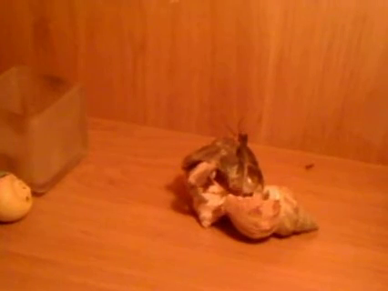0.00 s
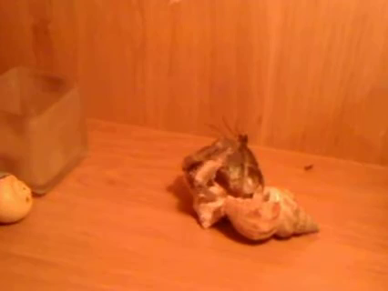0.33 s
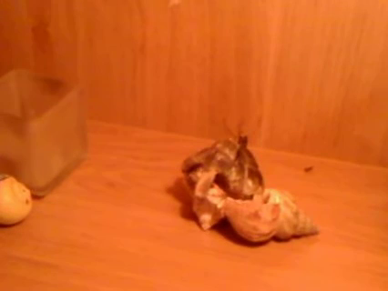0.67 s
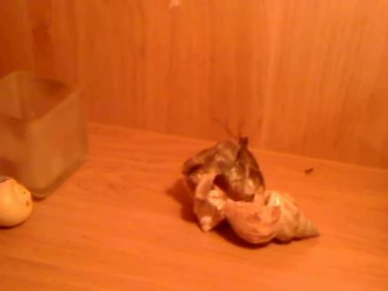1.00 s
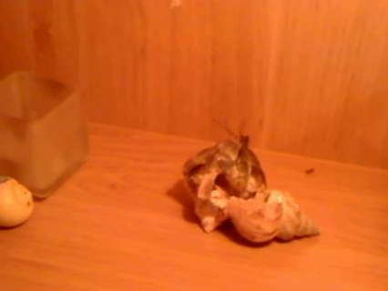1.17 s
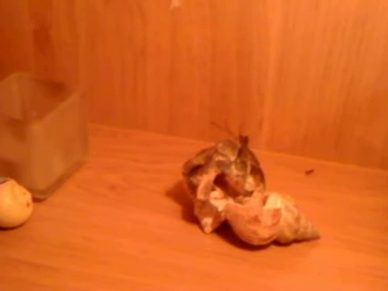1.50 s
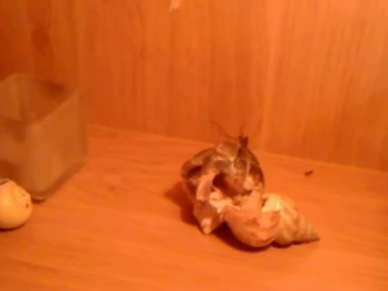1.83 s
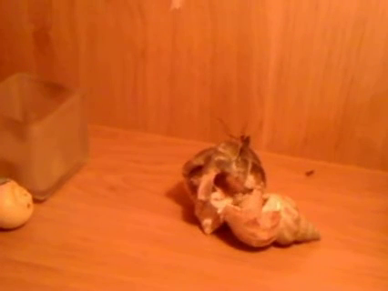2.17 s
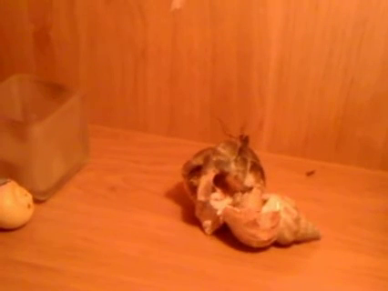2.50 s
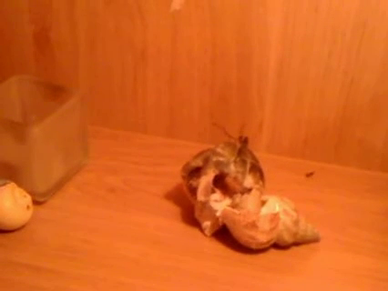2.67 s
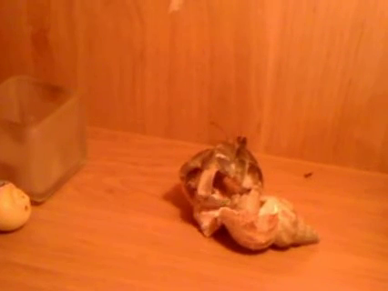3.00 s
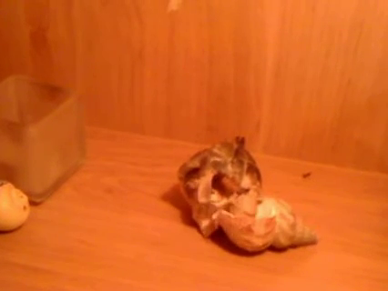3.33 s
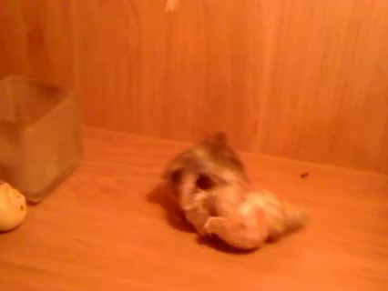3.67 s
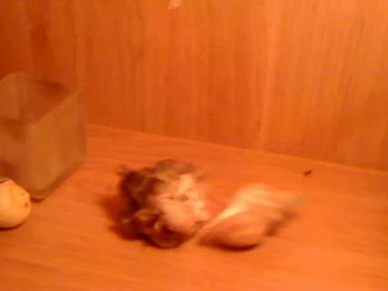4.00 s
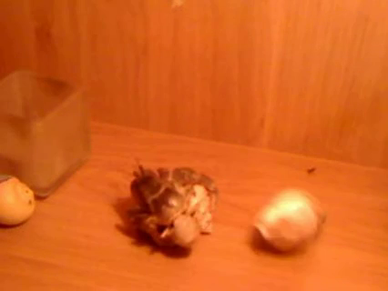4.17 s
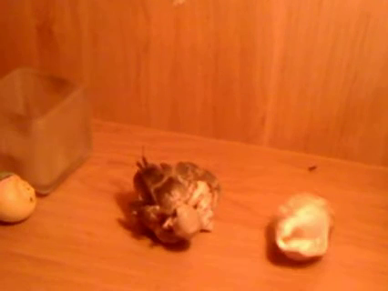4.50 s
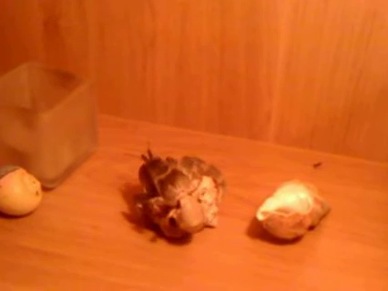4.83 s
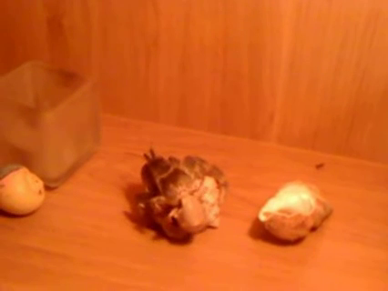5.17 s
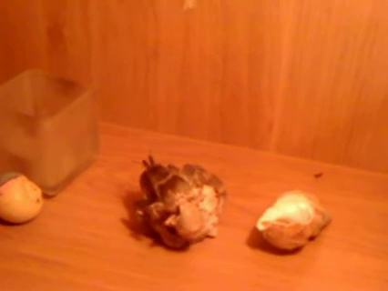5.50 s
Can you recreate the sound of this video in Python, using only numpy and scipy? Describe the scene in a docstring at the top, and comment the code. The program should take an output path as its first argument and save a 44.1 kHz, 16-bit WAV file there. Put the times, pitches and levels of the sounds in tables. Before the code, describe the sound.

Faint hiss and low rumble fill a quiet room, with a few tiny ticks as a hermit crab shifts on a wooden shelf. About two seconds in, its shells rock and knock on the board, clack sharply together and grind briefly along the wood. Lighter taps trail off. After a pause, the empty shell tips over with one soft knock. The microphone is close to the shelf.

```python
"""Faint hiss and rumble fill a quiet room; then come light taps, as a hermit crab changes shells on a
wooden shelf. The shells rock and knock on the board, clack together and grind along the wood for a moment;
a few taps follow, and the empty shell rolls off and tips over. Each impact excites damped modes of board
or shell, and a firmer blow on the board sounds brighter. The grinding is stick-slip friction on the wood,
with a rasp where one shell slides over the ridges of the other."""
import sys
import numpy as np
from scipy import signal
from scipy.fft import rfft, irfft, next_fast_len
from scipy.io import wavfile

SR = 44100
rng = np.random.default_rng(int(sys.argv[2]) if len(sys.argv) > 2 else 0)


def store_wav(level_fs):
    """Save 16-bit WAV to argv[1]."""
    pcm = np.round(np.clip(np.atleast_2d(level_fs), -1, 1) * 32767)
    wavfile.write(sys.argv[1], SR, pcm.T.astype(np.int16))


N = 246959

CUTOFF_HZ, ROOM_T60_S = 8750, 0.26
RING_TIME = np.arange(2 ** 13) / SR   # seconds since a touch
SPOT_Q = 5   # sharpness of the resonance that a point of contact favours
FIRM_DB = -40   # level of a firm blow, the reference for changes of timbre


def from_db(db):
    """Amplitude grows tenfold for every 20 dB."""
    return 10 ** (np.asarray(db) / 20)


def unit_rms(x):
    """Normalise a signal's mean power to 1."""
    return x / np.sqrt(np.mean(x ** 2) + 1e-20)


def unit_onset(x):
    """Normalise an impact to rms 1 over its first 12 ms."""
    return x / np.sqrt(np.mean(x[:int(.012 * SR)] ** 2))


def add(track, start_s, sound):
    """Superposition: a sound adds to the track from its start time on."""
    at = round(start_s * SR)
    track[at:at + len(sound)] += sound[:N - at]


def noise(spectrum, size):
    """Spectral shaping: white noise takes on the given spectrum, at rms 1."""
    hz, db = np.transpose(spectrum)
    bins = np.maximum(np.fft.rfftfreq(size, 1 / SR), 1)
    gain = from_db(np.interp(np.log(bins), np.log(hz), db)) * (bins < CUTOFF_HZ)
    return unit_rms(irfft(rfft(rng.standard_normal(size)) * gain, size))


def background():
    """Stationary noise: an even hiss lies over the low rumble of the room."""
    # The spectra of hiss and rumble. Each row: frequency in Hz, spectral density in dB.
    hiss = [(120, -29), (200, -1.5), (364, -4.5), (393, -6), (611, -8), (1090, -12.5), (1220, -12.5),
            (1390, -13), (1550, -12.5), (2050, -15), (6900, -18), (7830, -20.5), (8600, -39), (11200, -67),
            (18900, -120)]
    rumble = [(10, -12.5), (20, -4), (35, 1), (50, -4), (80, -4.5), (115, -13), (150, -14.5), (200, -18),
              (240, -35.5), (400, -55.5)]
    size = next_fast_len(N)
    return (from_db(-71) * noise(hiss, size) + from_db(-64) * noise(rumble, size))[:N]


def decay(t60):
    """Exponential damping: a vibration loses 60 dB in t60 seconds."""
    return np.exp(-np.log(1000) * RING_TIME / t60)


def ring(modes, spread_db):
    """Modal vibration: each point of contact excites the modes with its own strengths and phases."""
    hz, db, t60 = np.transpose(modes)[:, :, None]
    strength = from_db(db + spread_db * rng.standard_normal(hz.shape))
    phase = 2 * np.pi * rng.random(hz.shape)
    partials = strength * decay(t60) * np.sin(2 * np.pi * hz * RING_TIME + phase)
    return unit_onset(np.sum(partials, axis=0))


def dense_modes(spectrum, t60, rise_s):
    """Modal overlap: crowded, short-lived modes merge into bands of noise that swell and die."""
    hz, db = np.transpose(spectrum)
    edges = np.geomspace(100, CUTOFF_HZ, 25)[:, None]
    low, high = edges[:-1], edges[1:]
    bins = np.fft.rfftfreq(len(RING_TIME), 1 / SR)
    bands = irfft(rfft(rng.standard_normal(len(RING_TIME))) * ((bins >= low) & (bins < high)))
    bands = bands * decay(t60) * (1 - np.exp(-RING_TIME / rise_s))
    bands /= np.linalg.norm(bands, axis=1, keepdims=True)
    centre_db = np.interp(np.log(low * high) / 2, np.log(hz), db)
    share = from_db(centre_db) * np.sqrt(high - low)   # energy grows with bandwidth
    return unit_onset(np.sum(share * bands, axis=0))


def resonance(x, hz, db, q):
    """Resonant emphasis: the band around one frequency is raised or lowered."""
    return x + (from_db(db) - 1) * signal.lfilter(*signal.iirpeak(hz, q, fs=SR), x)


def contact(x, corner_hz):
    """A contact of finite duration acts as a low-pass filter on the vibration it drives."""
    return signal.lfilter(*signal.butter(3, np.clip(corner_hz, 200, SR / 3), fs=SR), x)


def shelf_response():
    """The board's impulse response: distinct modes, dense ones between them, and reverberation."""
    # The shelf's distinct modes. Each row: frequency in Hz, level in dB, 60 dB decay time in seconds.
    modes = [(188.2, -6.5, 0.23), (221.3, -5, .18), (551.5, -2, 0.19), (601, -9.5, 0.065), (623, -1, 0.086),
             (670.4, -4.5, 0.21), (743, -12.5, .13), (768, -10, 0.27), (845.4, -3.5, .2),
             (881.5, -1.5, .16), (930, -6.5, 0.12), (1006, -6.5, .13), (1044, -1, .19), (1169.5, 2, .13),
             (1234.4, 5.5, 0.17), (1470, -11, .25), (1578, -2.5, .12), (1639, 4, .14), (1716, -1, 0.12),
             (1790, 4.5, .12), (1864, -6, 0.09), (1930, -7.5, 0.19), (2110, -5, 0.2), (2310, -2.5, 0.15),
             (2490, -2.5, .12)]
    # The spectrum of its dense modes. Each row: frequency in Hz, spectral density in dB.
    spectrum = [(90, -28.5), (140, -15.5), (212, 3), (300, -6.5), (440, -18.5), (570, 3.5), (680, 2),
                (900, 3), (1200, -3), (1380, -7.5), (1720, 4.5), (2200, -5.5), (3200, -9.5), (4500, -5.5),
                (8500, -7)]
    crowd = from_db(3.5) * dense_modes(spectrum, t60=0.048, rise_s=0.005)
    room = from_db(-11) * noise(spectrum, len(RING_TIME)) * decay(ROOM_T60_S)
    ringing = from_db(1) * ring(modes, spread_db=1.07)
    spreading = 1 - np.exp(-RING_TIME / 0.002)   # bending waves need a moment to fill the board
    return crowd + spreading * (ringing + room)


def shell_response():
    """A shell's impulse response: a crack, a brief ring and reverberation."""
    # The shell's modes. Each row: frequency in Hz, level in dB, 60 dB decay time in seconds.
    modes = [(2370, -5, .06), (2640, -5, .05), (2835, -2, .04), (3185, 3, .05), (3630, -7, .05),
             (3930, -10, .04), (7260, -4, .026), (7570, -8, .026)]
    # The spectrum of the crack. Each row: frequency in Hz, spectral density in dB.
    spectrum = [(500, -27.5), (1200, -1.5), (1800, 13.5), (2300, 9), (3200, 7), (4200, 1), (5400, -0.5),
                (6500, -4.5), (8000, -18)]
    room = from_db(-21) * noise(spectrum, len(RING_TIME)) * decay(ROOM_T60_S)
    crack = dense_modes(spectrum, t60=0.049, rise_s=0.00057)
    ringing = from_db(-6) * ring(modes, spread_db=8)
    return unit_onset(crack + ringing + room)


def rasp(unevenness=0.11, ridge_memory_s=0.00045, slowing_octaves_per_s=10):
    """Frequency modulation: uneven ridges make a rough zip whose pitch sinks as the slide slows."""
    # One shell slides over the ridges of the other.
    # Each row: start in seconds, length in seconds, level in dB, initial ridge rate in Hz.
    slides = [(2.267, 0.047, -57, 4030), (2.319, 0.078, -59.5, 2050), (2.524, 0.03, -50.5, 3380)]
    pole = np.exp(-1 / (ridge_memory_s * SR))
    out = np.zeros(N)
    for start, length, db, start_hz in slides:
        jitter = unit_rms(signal.lfilter([1], [1, -pole], rng.standard_normal(len(RING_TIME))))
        hz = start_hz * 2 ** (-slowing_octaves_per_s * RING_TIME)
        phase = 2 * np.pi * np.cumsum(hz * (1 + unevenness * jitter)) / SR
        swell = np.sin(np.pi * np.minimum(RING_TIME / length, 1))
        add(out, start, from_db(db) * swell * np.sqrt(2) * np.sin(phase))
    return out


def drag(slips_per_s=500, point_count=8, attack_s=0.006, release_s=0.011, grit_fade_db_per_s=55):
    """Stick-slip friction: points of the rim slip in turn, each tapping the board and ticking the shell."""
    # The rim drags on the wood. Each row: start in seconds, length in seconds, level of the wood in dB,
    # contact corner in Hz, initial level of the shell's grit in dB.
    strokes = [(2.162, 0.03, -50.5, 750, -90), (2.226, 0.021, -43.5, 910, -67),
               (2.311, 0.075, -52, 398, -57), (2.459, 0.1675, -39.5, 1980, -51),
               (2.669, 0.021, -42, 1740, -68), (3.197, 0.03, -49.5, 1250, -89)]
    points = [(resonance(shelf_response(), hz=1720, db=-1.5, q=SPOT_Q), shell_response())
              for _ in range(point_count)]
    out = np.zeros(N)
    for start, length, db, corner_hz, grit_db in strokes:
        slip_count = int((length + release_s) * slips_per_s)
        jitter, direction = rng.standard_normal((N // 100, 2))[:slip_count].T
        ages = (np.arange(slip_count) + jitter / 2) / slips_per_s
        pressure = np.clip(np.minimum(ages / attack_s, 1 + (length - ages) / release_s), 0, 1)
        slips = np.sign(direction) * pressure * np.sqrt(SR / slips_per_s)
        for k, (board, shell) in enumerate(points):
            wood = from_db(db) * contact(board / np.linalg.norm(board), corner_hz)
            tick = shell / np.linalg.norm(shell)
            for age, slip in zip(ages[k::point_count], slips[k::point_count]):
                grit = from_db(grit_db - grit_fade_db_per_s * age) * tick
                add(out, start + age, slip * (wood + grit))
    return out


def blow(db, spot_hz, spot_db, thump_db, firm_corner_hz, octaves_per_db):
    """Impact on the board: a firmer contact is shorter and so brighter, and weight adds a low thump."""
    corner_hz = firm_corner_hz * 2 ** (octaves_per_db * (db - FIRM_DB))
    wood = resonance(contact(shelf_response(), corner_hz), hz=205, db=thump_db, q=1.5)
    return from_db(db) * unit_onset(resonance(wood, spot_hz, spot_db, SPOT_Q))


def taps(bounce_s=0.013, bounce_db=-9):
    """Elastic rebound: a hard, light tip strikes the board and bounces once."""
    # The shell's rim and the crab's leg tips tap the board. Each row: start in seconds, level in dB,
    # resonance favoured at the point of contact in Hz, its boost in dB.
    strikes = [(0.445, -66, 606, 2), (1.225, -60.5, 850, 2.5), (1.657, -68, 1240, 6),
               (2.452, -33.5, 1680, 7.5), (2.5185, -34.5, 1740, 4), (2.5481, -37, 1740, 6),
               (2.579, -37, 555, 7.5), (2.597, -40, 1710, 8), (2.667, -45.5, 1740, 3.5),
               (2.754, -49, 1696, 5.5), (2.891, -52.5, 1610, 6.5), (2.9864, -70.5, 1240, 2),
               (3.011, -46.5, 884, 6), (3.1426, -57, 1240, 4.5), (3.190, -49, 920, 10.5)]
    out = np.zeros(N)
    for start, level_db, spot_hz, spot_db in strikes:
        rebound = start + bounce_s * rng.uniform(.8, 1.2)
        for when, db in ((start, level_db), (rebound, level_db + bounce_db)):
            tap = blow(db, spot_hz, spot_db, thump_db=1, firm_corner_hz=1970, octaves_per_db=0.04)
            add(out, when, tap)
    return out


def clacks():
    """Hard impact excites a shell's modes; the lighter the touch, the more the treble dominates."""
    # Shell clacks on shell, or a claw ticks on it. Each row: start in seconds, level in dB.
    touches = [(0.700, -76), (1.2265, -64), (2.267, -58), (2.316, -53.5), (2.4511, -39.5), (2.4542, -31),
               (2.471, -42.5), (4.443, -70), (4.685, -77)]
    out = np.zeros(N)
    for start, db in touches:
        treble_db = 0.96 * max(FIRM_DB - db, 0)
        clack = resonance(shell_response(), hz=6800, db=treble_db, q=2.1)
        add(out, start, from_db(db) * unit_onset(clack))
    return out


def knocks(rock_back_s=0.04, rock_back_db=-20, shell_db=-20):
    """The shelf acts as a soundboard: a heavy shell drops on it, rings faintly and rocks back once."""
    # A shell's body rocks onto the board. Each row: start in seconds, level in dB,
    # resonance favoured at the point of contact in Hz, its boost in dB.
    impacts = [(2.058, -65, 606, 6), (2.089, -53, 1240, 12.5), (2.102, -52.5, 1260, 6),
               (2.198, -44.5, 1250, 6), (2.2535, -37, 636, 5), (2.284, -42.5, 1250, 0),
               (2.3514, -33, 633, 10.5), (4.455, -46.5, 640, 5.5)]
    out = np.zeros(N)
    for start, level_db, spot_hz, spot_db in impacts:
        for when, db in ((start, level_db), (start + rock_back_s, level_db + rock_back_db)):
            thump_db = 5 + 0.43 * (db - FIRM_DB)
            add(out, when, blow(db, spot_hz, spot_db, thump_db, firm_corner_hz=1130, octaves_per_db=0.05))
        ping = resonance(shell_response(), hz=2340, db=10, q=2.5)
        add(out, start, from_db(level_db + shell_db) * unit_onset(ping))
    return out


def scene():
    """The pressures of all sources add at one point close to the shelf."""
    return (background() + knocks() + taps() + clacks() + drag() + rasp())[None]


def record(dry):
    """Band limiting: a steep low-pass filter removes the highest treble."""
    return signal.sosfilt(signal.ellip(10, .1, 80, CUTOFF_HZ, fs=SR, output="sos"), dry)


dry = scene()
out = record(dry)
store_wav(out)
```